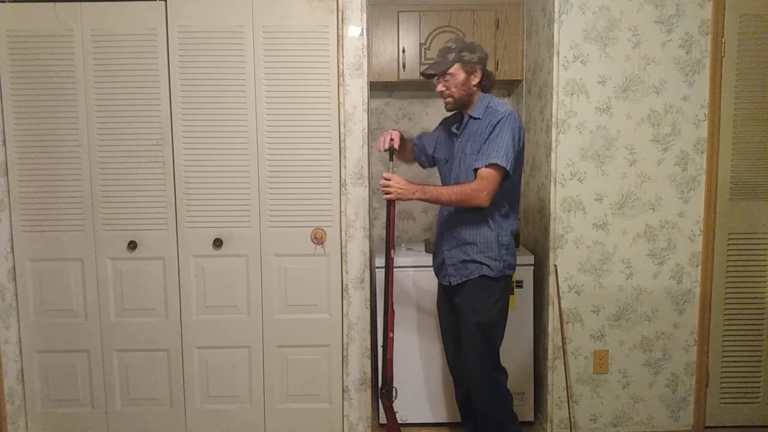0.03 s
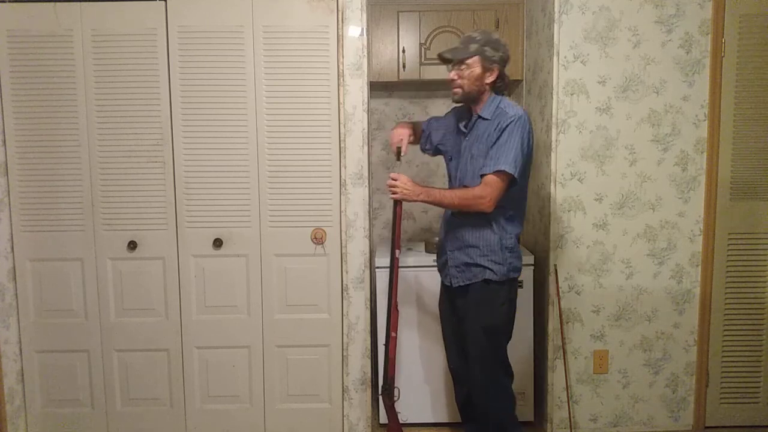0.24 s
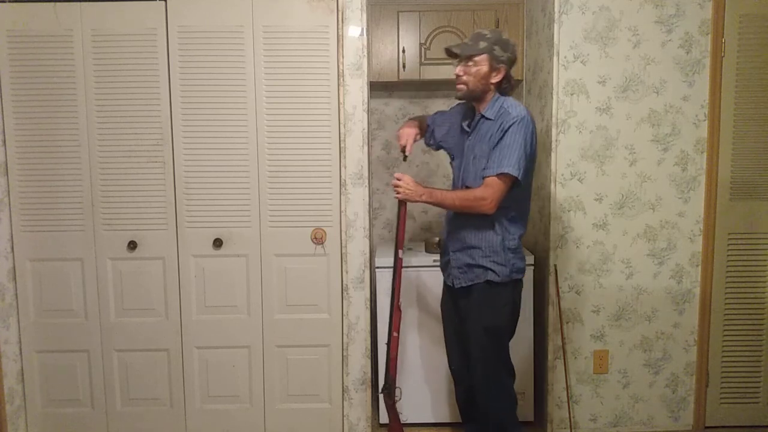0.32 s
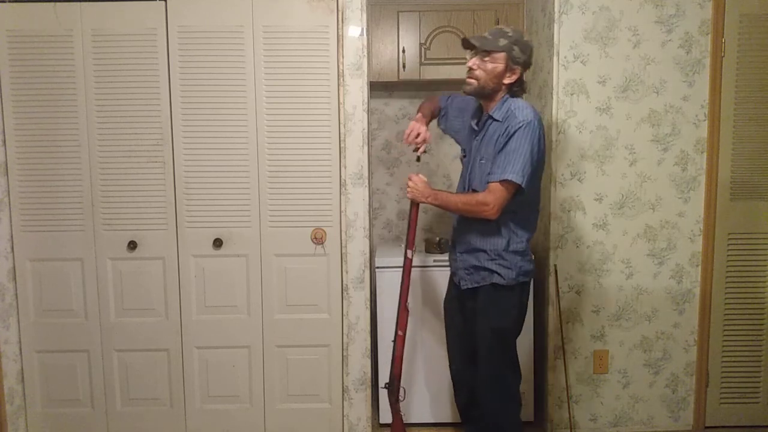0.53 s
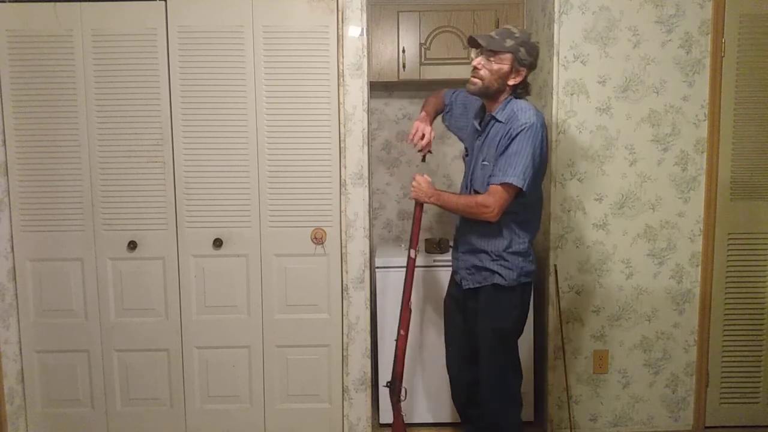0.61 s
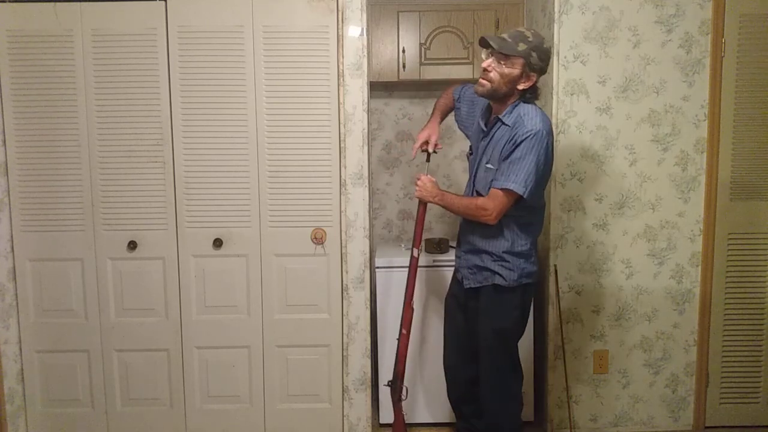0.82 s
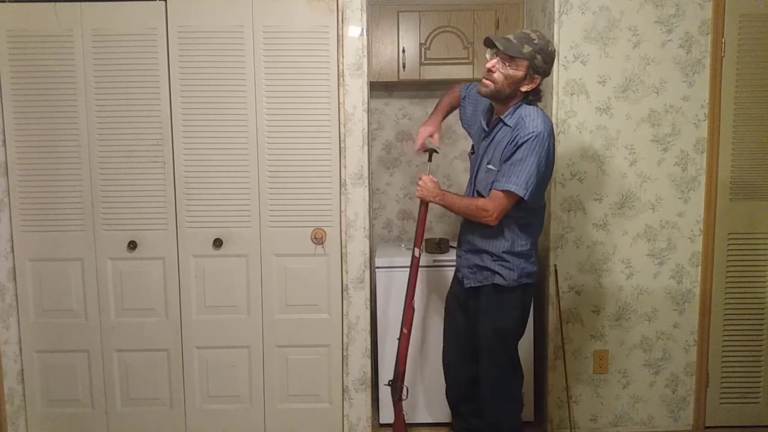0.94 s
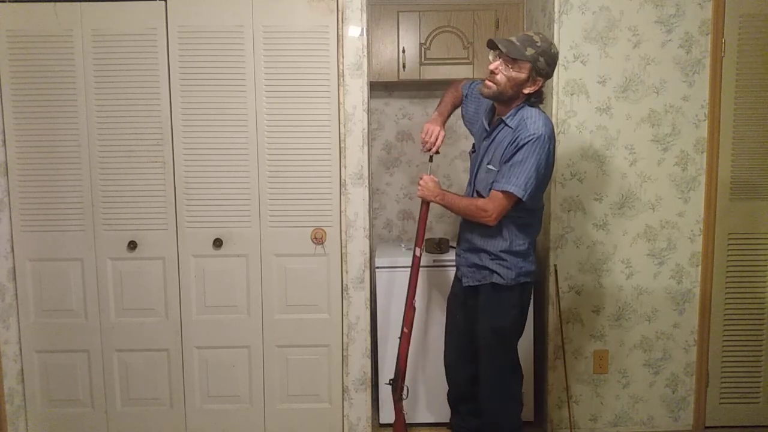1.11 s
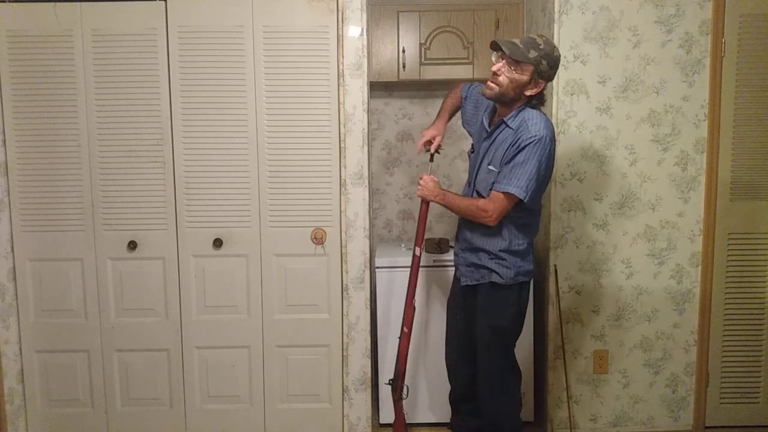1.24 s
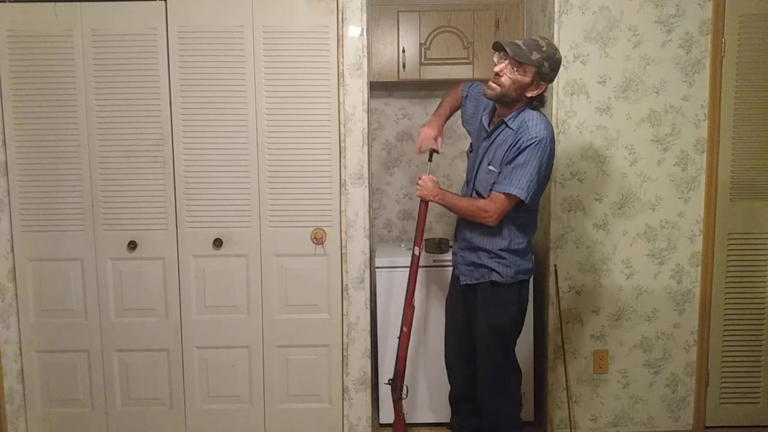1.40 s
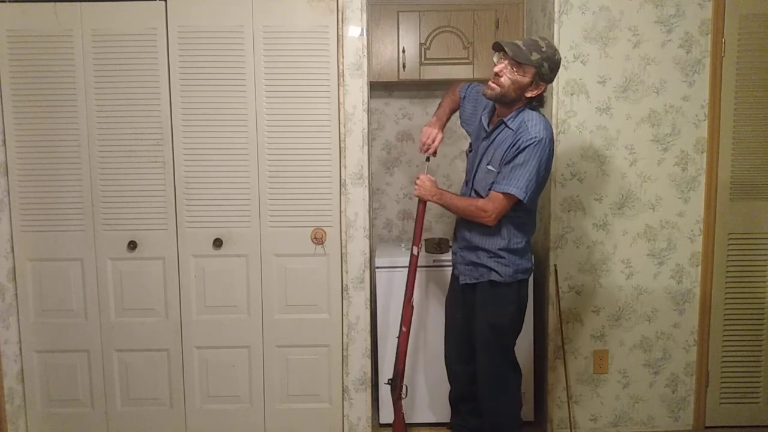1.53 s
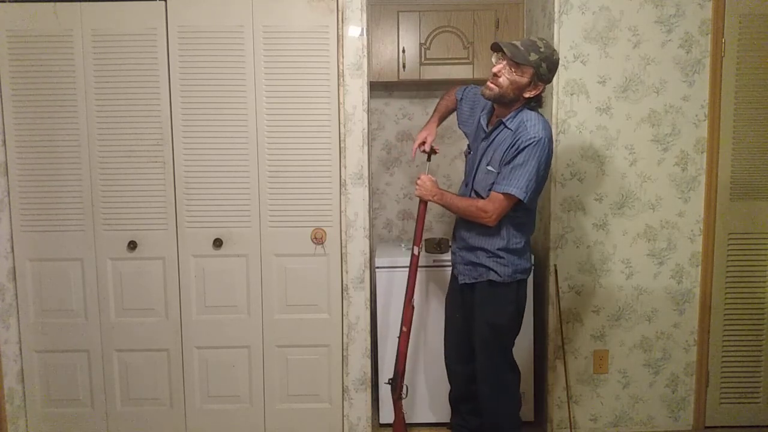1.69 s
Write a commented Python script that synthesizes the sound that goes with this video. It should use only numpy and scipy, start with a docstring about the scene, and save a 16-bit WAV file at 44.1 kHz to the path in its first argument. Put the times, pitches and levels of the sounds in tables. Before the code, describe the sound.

A cleaning rod scrapes in uneven metallic jerks through a long rifle barrel, with dull floor thumps

```python
"""Small hard-walled room: a cleaning rod jerks through a long steel barrel, a few metres from a phone.
Each slip is a short burst of noise grit, coloured by the scrape and by the ring of barrel and rod.
The stock thumps on the floor: decaying sine modes over a dull noise thud; faint narrow 340 Hz rings
sound among the slips. Noise tails make the room ring on. Behind lie faint air, a low wavering hum and,
at the start, a faint ring of noise bands dying away."""
import sys
import numpy as np
from scipy import signal
from scipy.fft import rfft, irfft
from scipy.io import wavfile
from scipy.ndimage import uniform_filter1d

SR = 44100
rng = np.random.default_rng(int(sys.argv[2]) if len(sys.argv) > 2 else 0)


def how_loud(loudness_db):
    """Turn decibels into a plain amplitude multiplier (0 dB gives 1, 20 dB gives 10)."""
    steps = np.asarray(loudness_db, float) / 20
    return 10 ** steps


def store_wav(level_fs):
    """Save 16-bit WAV to argv[1]."""
    pcm = np.round(np.clip(np.atleast_2d(level_fs), -1, 1) * 32767)
    wavfile.write(sys.argv[1], SR, pcm.T.astype(np.int16))


N = 77175

# room air spectrum: freq_hz, relative_level_db
AIR_SPECTRUM = [(30, -41), (60, -27), (120, -19), (300, -17), (800, -18), (2000, -21), (4300, -23.5),
                (6000, -28), (15000, -27.5)]
# left-right likeness of noise: freq_hz, likeness_0_to_1
LIKENESS = [(60, 0.9), (300, 0.4), (600, 0.24), (1500, 0.01), (15000, 0.06)]
# noise bands of the faint opening ring: centre_hz, width_hz, relative_level_db
FADING_BANDS = [(490, 33, 4.5), (1260, 180, 3), (2282, 52, 12), (2960, 410, 4.5), (3610, 480, -1.5),
                (4430, 380, -1.5), (7340, 3000, -18)]
# room decay by band: centre_hz, t60_s
ROOM_DECAY = [(125, 0.37), (500, 0.39), (1500, 0.26), (4000, 0.27), (9000, 0.26), (14000, 0.21)]
# thumps of the stock on the floor, and faint narrow 340 Hz rings heard among the slips:
# start_s, level_db, centre_hz, rise_s, decay_scale, spread_octaves
THUMPS_AND_RINGS = [(0.2123, -24, 300, 0.0051, 0.26, 1.47), (.224, -17, 258, 0.008, 0.57, 0.27),
                    (0.23, -20, 117, 0.0099, 0.42, 1.18), (0.244, -37, 387, 0.024, 0.67, 1.3),
                    (0.289, -22.5, 116, 0.013, 0.3, 0.1), (0.305, -30.5, 241, 0.031, 1.78, 0.065),
                    (0.39, -32.5, 107, 0.0092, 0.27, 1.37), (0.735, -23.5, 92, 0.041, 0.52, 0.9),
                    (0.791, -41, 101, 0.0076, 0.25, 0.6), (0.824, -43.5, 60.7, 0.011, 0.64, 0.39),
                    (0.871, -37, 100, 0.017, 0.75, 0.5), (0.917, -55, 118, 0.024, 0.15, 0.8),
                    (0.951, -53, 340, 0.0041, 0.29, 0.078), (1.087, -33.5, 156, 0.007, 0.33, 0.48),
                    (1.126, -30.5, 264, 0.016, 0.49, 0.27), (1.126, -38.5, 390, 0.015, 0.38, 0.45),
                    (1.129, -31, 143, 0.021, 0.7, 0.26), (1.193, -37, 148, 0.014, 0.37, 0.98),
                    (1.21, -46.5, 57, 0.0074, 0.79, 0.75), (1.335, -57.5, 340, 0.0044, 0.85, 0.048),
                    (1.335, -50.5, 111, 0.022, 0.7, 1.4), (1.566, -52, 340, 0.041, 0.95, 0.042),
                    (1.699, -57, 340, 0.025, 1.1, 0.096)]
# modes of stock and floor, and the 340 Hz ring: freq_hz, relative_level_db, t60_s (before decay_scale)
LOW_MODES = [(57, -13.5, 0.46), (92, -2, 0.17), (112.5, 1.25, 0.24), (143, -3.5, 0.23), (184, -2, 0.24),
             (241, -5.5, 0.11), (256.4, 4, 0.14), (340, 1.5, 0.21), (372.6, -1, 0.28), (422, -1.5, 0.26),
             (510, -9, 0.32), (582, -4.5, 0.25), (655, -12, 0.34)]
# slips of the rod: start_s, relative_level_db, low_share_db, high_share_db, length_s, rise_s
SLIPS = [(0.2087, -46.5, 7.5, -44, 0.034, 0.0045), (.292, -46, 8, -27, 0.013, 0.0017),
         (0.3175, -37, -11, -12.5, 0.013, 0.00037), (0.3566, -35, 5, -2.5, 0.015, 0.00029),
         (0.37, -31, 6, 5, 0.0092, 0.0036), (0.482, -43.5, 1, -34, 0.018, 0.0041),
         (0.5147, -34, -16, -6.5, 0.01, 0.0024), (0.526, -31.5, 5.5, -19, 0.0084, 0.0049),
         (0.5948, -25, -1, 2, 0.017, 0.0057), (.669, -30.5, 8, 2.5, 0.013, 0.0041),
         (0.684, -34, 8.5, -20, 0.017, 0.0038), (0.755, -38, 10, -9.5, 0.011, 0.0025),
         (0.856, -37.5, 7.5, 0.5, 0.014, 0.0035), (0.9001, -22, 0.5, -5.5, 0.004, 0.0016),
         (0.939, -27.5, 5, -9, 0.011, 0.0079), (1.06, -30, 6.5, 1, 0.015, 0.0027),
         (1.115, -33, 5, -3.5, 0.021, 0.016), (1.17, -33.5, 11.5, 0, 0.019, 0.011),
         (1.194, -28, 3.5, -8, 0.0047, 0.0014), (1.222, -41.5, -1.5, -18, 0.024, 0.0052),
         (1.328, -27.5, 7.5, 4.5, 0.0081, 0.00043), (1.358, -19.5, -16, -4, 0.0036, 0.00099),
         (1.411, -34.5, 6.5, -8.5, 0.015, 0.0028), (1.467, -33.5, 5.5, -5.5, 0.011, 0.0018),
         (1.553, -35.5, 3, -9.5, 0.013, 0.0031), (1.572, -29.5, 7, -2, 0.025, 0.016),
         (1.653, -33.5, 8.5, -18, 0.012, 0.0019), (1.718, -39.5, 9, -3, 0.0079, 0.0011)]
# scrape colour: freq_hz, relative_level_db
SCRAPE_COLOUR = [(300, -25), (560, -20.5), (720, -11), (1200, -6.5), (1600, -14), (3000, 0), (5500, -5.5),
                 (11000, 0.5), (15500, -4.5)]
# ring of barrel and rod, before each contact shifts it: freq_hz, width_hz, relative_level_db
BARREL_MODES = [(1189, 118, -0.5), (1402.4, 72, 7), (1751, 161, 3), (2142, 260, -3), (3470, 290, -7.5),
                (4393, 590, -1), (4110, 550, -11), (6006, 140, 0), (7376, 60, -1.5), (8560, 430, -16),
                (9840, 280, -4.5), (10800, 410, -4),]

AIR_DB, HUM_DB, HUM_HZ, HUM_HALF_WIDTH_HZ = -83, -80, 57, 14
FADING_DB, FADING_HOLD_S, FADING_T60_S = -63.5, 0.029, 0.26
ROOM_BUILD_S = 0.00041
SLIP_TAIL_DB, THUMP_TAIL_DB = 8, -10  # tail over direct sound
THUD_DB, THUD_T60_S = -22, 0.32  # re row level; t60 before decay_scale
LOW_SPLIT_HZ, HIGH_SPLIT_HZ = 1177, 6660
RING_DB, SLIP_DB = 8, -13
GRIT_SCATTER_DB = 4
CATCH_DB, CATCH_PER_S = 6.5, 250  # rod catches and frees within a slip
SLIP_GROUPS = 10
CONTACT_DB, CONTACT_SHIFT = 1.5, 0.01  # spread of mode level and fractional detuning per contact place
# As the rod goes deeper, modes over the pivot gain and those under it fade.
DEPTH_DB_PER_S, PIVOT_HZ, MIDWAY_S = 1.5, 3740, 0.96
LEFT_OVER_RIGHT_DB = -1
TOP_HZ = 15750


def shape(points, size):
    """Table interpolated over log frequency on the bins of a transform."""
    table = np.array(points, float)
    log_hz = np.log(np.fft.rfftfreq(size, 1 / SR) + 1)
    return np.interp(log_hz, np.log(table[:, 0]), table[:, 1])


def unit(x):
    """Scale to rms 1."""
    return x / np.sqrt(np.mean(x ** 2))


def causal(gain):
    """Minimum-phase response with this magnitude, by folding the cepstrum."""
    cepstrum = irfft(np.log(gain + 1e-6))
    half = len(cepstrum) // 2
    cepstrum[1:half] *= 2
    cepstrum[half + 1:] = 0
    return irfft(np.exp(rfft(cepstrum)))


def peaks(table, size):
    """Summed power of steep resonances; width_hz is full width at -6 dB."""
    f_hz = np.fft.rfftfreq(size, 1 / SR)
    return sum(how_loud(2 * db) / (1 + (2 * (f_hz - hz) / width_hz) ** 2) ** 2 for hz, width_hz, db in table)


def stereo_noise(size):
    """Noise pair whose left-right correlation falls from bass to treble."""
    likeness = np.clip(shape(LIKENESS, size), 0, 1)
    mid, side = rfft(rng.standard_normal((2, size)))
    mid = np.sqrt((1 + likeness) / 2) * mid
    side = np.sqrt((1 - likeness) / 2) * side
    return irfft(mid + side * np.array([[1], [-1]]), size)


def air():
    """Faint shaped room noise plus a hum: narrow-band noise, so its level wavers."""
    noise = rfft(stereo_noise(N))
    f_hz = np.fft.rfftfreq(N, 1 / SR)
    hum_gain = 1 / (1 + ((f_hz - HUM_HZ) / HUM_HALF_WIDTH_HZ) ** 2)
    hiss = unit(irfft(noise * how_loud(shape(AIR_SPECTRUM, N)), N))
    hum = unit(irfft(noise * hum_gain, N))
    return how_loud(AIR_DB) * hiss + how_loud(HUM_DB) * hum


def fading():
    """Resonant noise bands that hold briefly, then die exponentially."""
    t_s = np.arange(N) / SR
    bands = unit(irfft(rfft(stereo_noise(N)) * np.sqrt(peaks(FADING_BANDS, N)), N))
    return bands * how_loud(FADING_DB - 60 * np.maximum(t_s - FADING_HOLD_S, 0) / FADING_T60_S)


def room(x, tail_db):
    """Direct sound plus a dense stereo noise tail that dies band by band."""
    size = SR // 2
    t_s = np.arange(size) / SR
    spectrum = rfft(stereo_noise(size))
    octave = np.log2(np.fft.rfftfreq(size, 1 / SR) + 1)
    centres = np.log2(np.array(ROOM_DECAY)[:, 0])
    tail = 0
    for k, (hz, t60_s) in enumerate(ROOM_DECAY):
        share = np.interp(octave, centres, np.eye(len(centres))[k])  # crossfaded bands
        tail = tail + irfft(spectrum * share, size) * how_loud(-60 * t_s / t60_s)
    tail = tail * (1 - np.exp(-t_s / ROOM_BUILD_S))
    tail = tail / np.sqrt(np.mean(np.sum(tail ** 2, axis=1)))  # unit energy
    return x + how_loud(tail_db) * signal.fftconvolve(x[None], tail, axes=1)[:, :N]


def thumps_and_rings():
    """Floor blows and narrow 340 Hz rings: modes near the centre swell over a noise thud and die away."""
    t_s, out = np.arange(N) / SR, np.zeros(N)
    f_hz = np.fft.rfftfreq(N, 1 / SR) + 1  # +1 avoids log of zero
    noise = rfft(rng.standard_normal(N))
    for start_s, db, centre_hz, rise_s, decay_scale, octaves in THUMPS_AND_RINGS:
        since_s = np.maximum(t_s - start_s, 0)
        swell = (1 - np.exp(-since_s / rise_s)) ** 2
        thud_gain = np.exp(-(np.log2(f_hz / centre_hz) / (2 * octaves)) ** 2)
        thud = unit(irfft(noise * thud_gain, N))
        out += swell * how_loud(db + THUD_DB - 60 * since_s / (THUD_T60_S * decay_scale)) * thud
        for hz, mode_db, t60_s in LOW_MODES:
            near = np.exp(-(np.log2(hz / centre_hz) / octaves) ** 2)
            decay = how_loud(db + mode_db - 60 * since_s / (t60_s * decay_scale))
            out += near * decay * swell * np.sin(2 * np.pi * hz * since_s)
    return out


def grit_clicks():
    """Noise of uneven clicks, in which the rod catches and frees."""
    catch = np.interp(np.arange(N) / SR * CATCH_PER_S, np.arange(N // 20), rng.standard_normal(N // 20))
    click_db = GRIT_SCATTER_DB * rng.exponential(size=N) + CATCH_DB * catch
    grit = unit(rng.standard_normal(N) * how_loud(click_db))
    return grit / np.sqrt(uniform_filter1d(grit ** 2, size=400))  # evened over 9 ms: slips keep set loudness


def barrel_body(mean_s):
    """Scrape colour plus barrel modes, stirred and detuned by contact place and tilted by depth."""
    depth_db = DEPTH_DB_PER_S * (mean_s - MIDWAY_S)
    chance = rng.standard_normal((len(BARREL_MODES), 2))
    stirred = []
    for (hz, width_hz, db), (detune, stir) in zip(BARREL_MODES, chance):
        tilt_db = depth_db * np.tanh(4 * np.log(hz / PIVOT_HZ))
        stirred.append((hz * (1 + CONTACT_SHIFT * detune), width_hz, db + CONTACT_DB * stir + tilt_db))
    ring_power = how_loud(2 * RING_DB) * peaks(stirred, size=8192)
    body = causal(how_loud(shape(SCRAPE_COLOUR, size=8192)) * np.sqrt(1 + ring_power))
    return body / np.sqrt(np.sum(body ** 2))


def slips(rows):
    """Each slip is a grit burst in three bands, ringing the barrel."""
    t_s, gains = np.arange(N) / SR, np.zeros((3, N))
    for start_s, db, low_db, high_db, length_s, rise_s in rows:
        since_s = np.maximum(t_s - start_s, 0)
        envelope = (1 - np.exp(-since_s / rise_s)) * np.exp(-(since_s / length_s) ** 2)
        gains += how_loud(np.array([[low_db], [0], [high_db]]) + db) * envelope
    grit = grit_clicks()

    def band(gain, edge_hz, kind):
        """Second-order Butterworth band of the gated grit."""
        return signal.sosfilt(signal.butter(2, edge_hz, kind, fs=SR, output="sos"), grit * gain)

    low = band(gains[0], LOW_SPLIT_HZ, "low")
    mid = band(gains[1], [LOW_SPLIT_HZ, HIGH_SPLIT_HZ], "band")
    high = band(gains[2], HIGH_SPLIT_HZ, "high")
    body = barrel_body(np.mean(rows[:, 0]))
    return how_loud(SLIP_DB) * signal.fftconvolve(low - mid + high, body)[:N]


def scene():
    """Slips, thumps and rings over air; each successive slip group has its own random tail and barrel ring."""
    pan = how_loud(np.array([[LEFT_OVER_RIGHT_DB], [-LEFT_OVER_RIGHT_DB]]) / 2)
    groups = np.array_split(np.array(SLIPS), SLIP_GROUPS)
    rod = sum(room(slips(rows), SLIP_TAIL_DB) for rows in groups)
    return pan * (rod + room(thumps_and_rings(), THUMP_TAIL_DB)) + air() + fading()


def top_cut(x):
    """Nothing passes above the cut-off."""
    return signal.sosfilt(signal.butter(12, 16650, fs=SR, output="sos"), x)


def record(dry):
    """The phone cuts the top with a steep elliptic low-pass."""
    low_pass = signal.ellip(8, 0.2, 45, TOP_HZ, fs=SR, output="sos")  # order, ripple dB, stopband dB
    cut = signal.sosfilt(low_pass, dry)
    return top_cut(cut)


dry = scene()
out = record(dry)
store_wav(out)
```